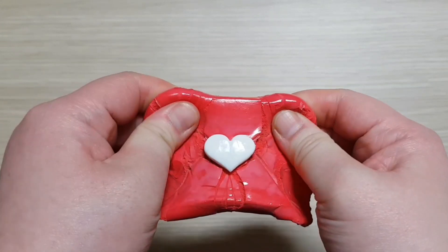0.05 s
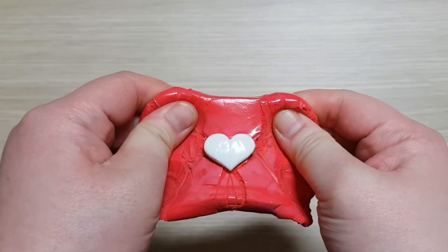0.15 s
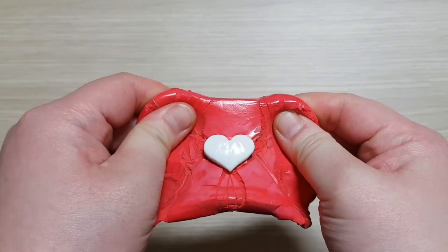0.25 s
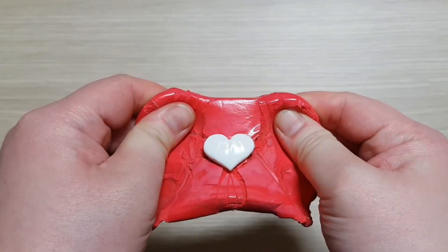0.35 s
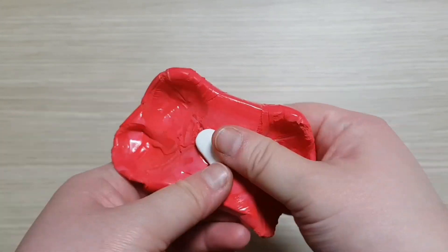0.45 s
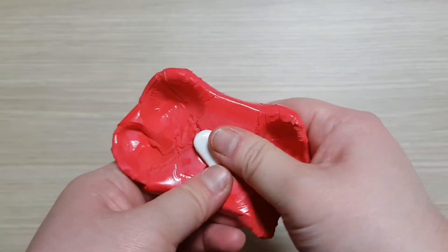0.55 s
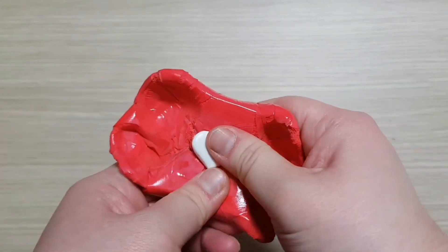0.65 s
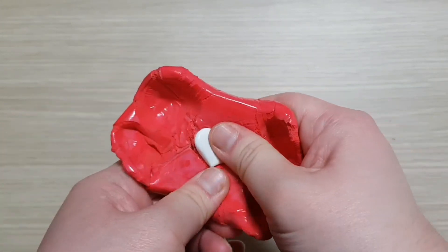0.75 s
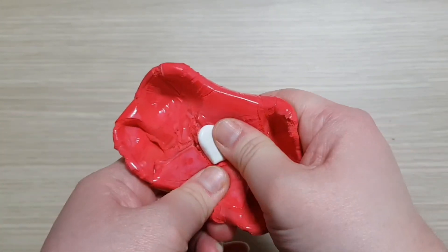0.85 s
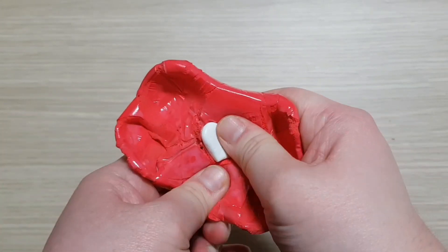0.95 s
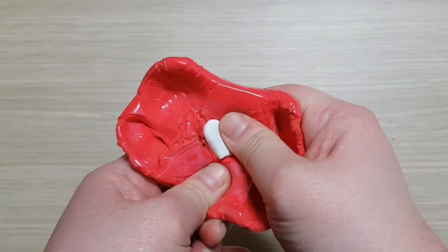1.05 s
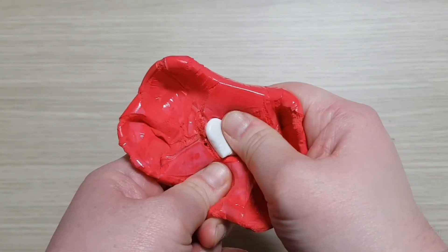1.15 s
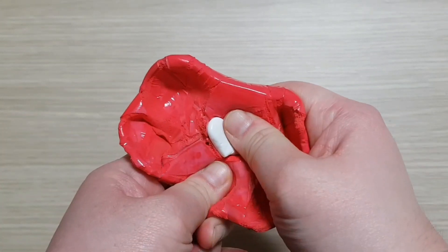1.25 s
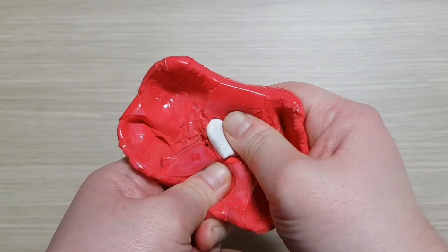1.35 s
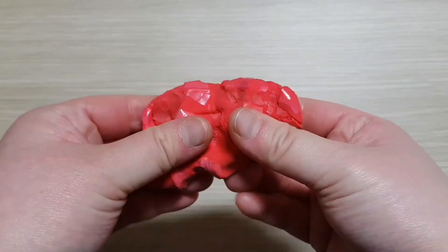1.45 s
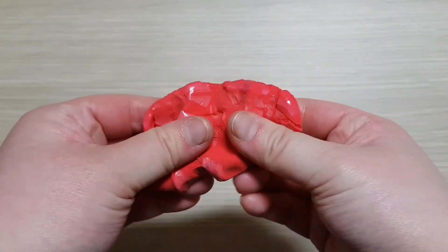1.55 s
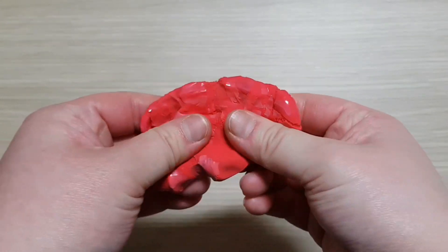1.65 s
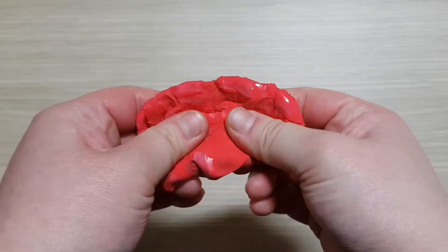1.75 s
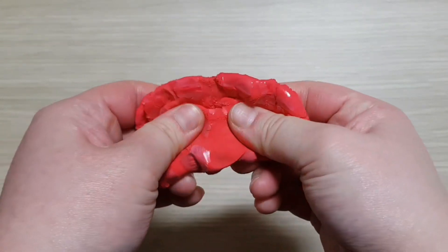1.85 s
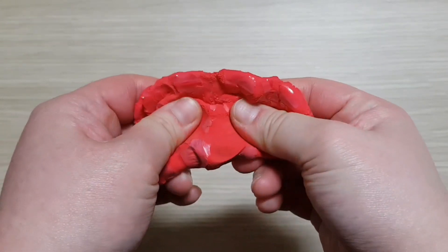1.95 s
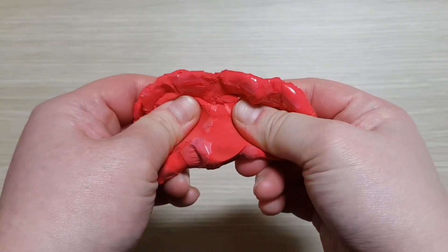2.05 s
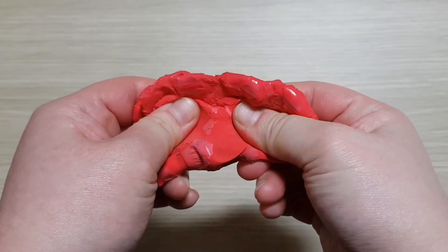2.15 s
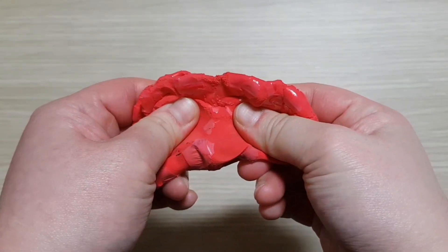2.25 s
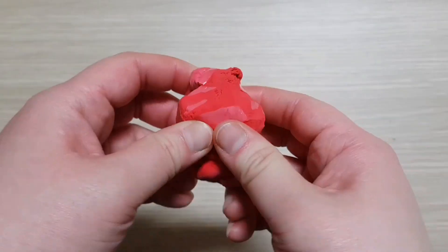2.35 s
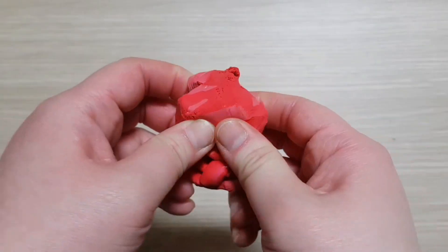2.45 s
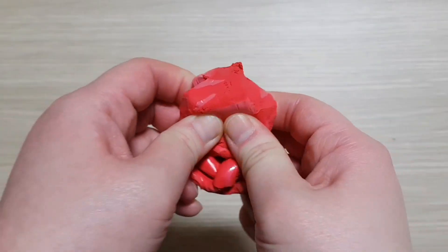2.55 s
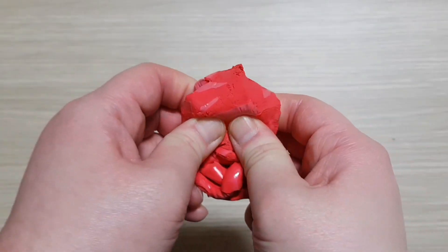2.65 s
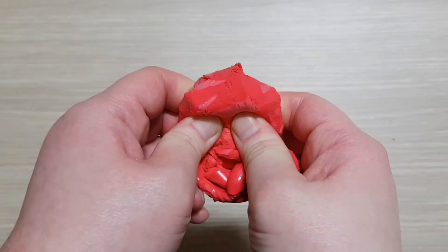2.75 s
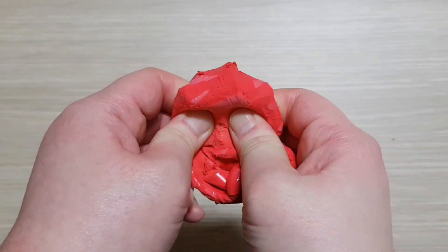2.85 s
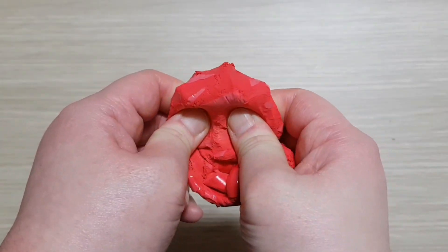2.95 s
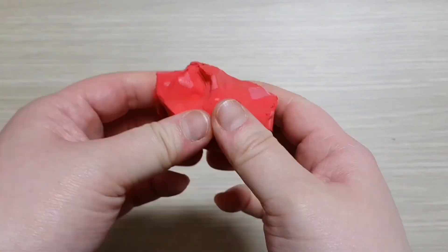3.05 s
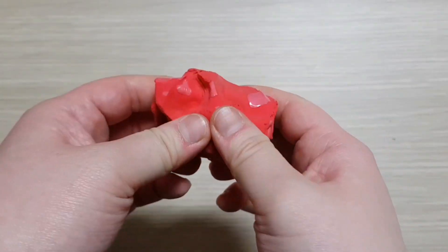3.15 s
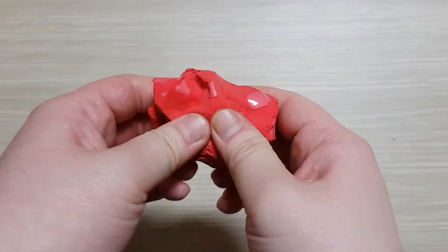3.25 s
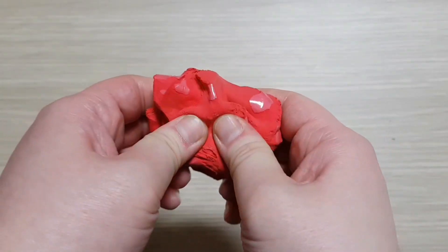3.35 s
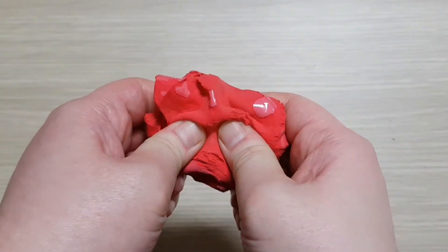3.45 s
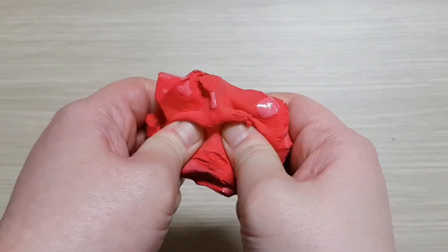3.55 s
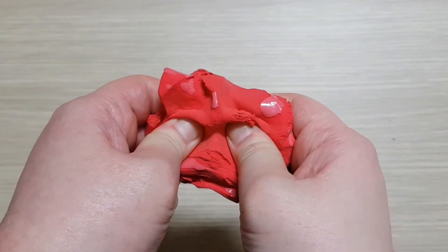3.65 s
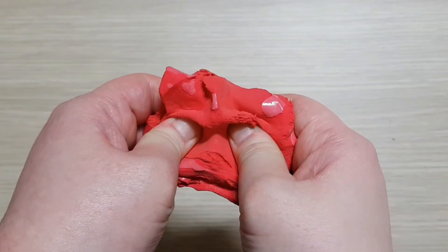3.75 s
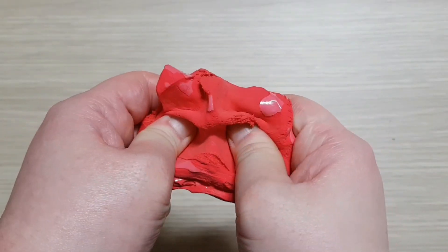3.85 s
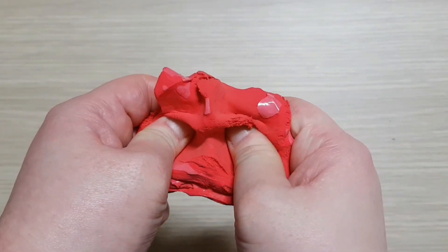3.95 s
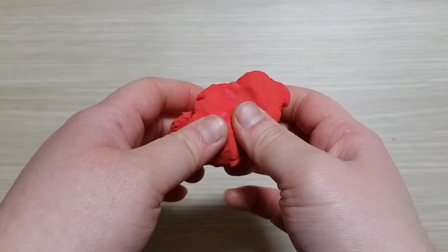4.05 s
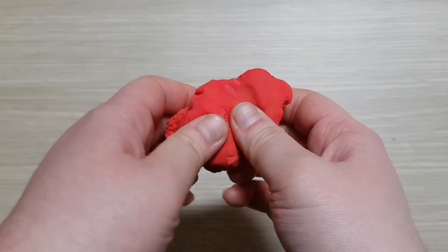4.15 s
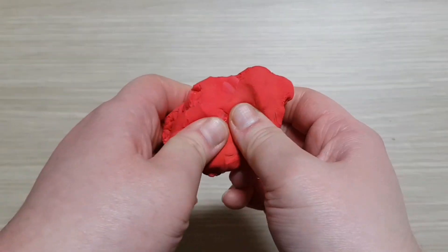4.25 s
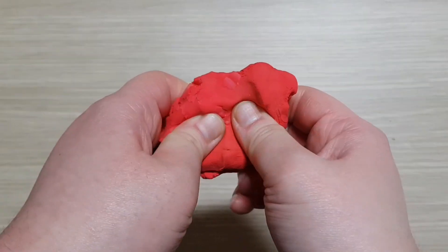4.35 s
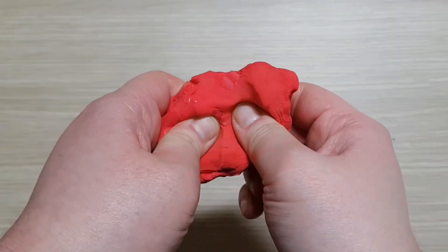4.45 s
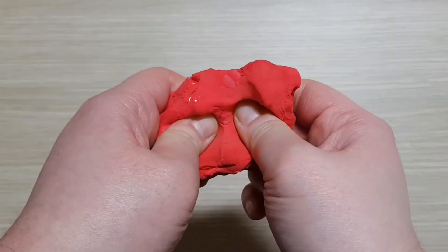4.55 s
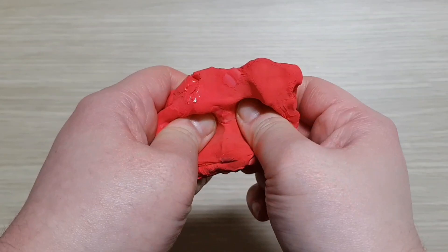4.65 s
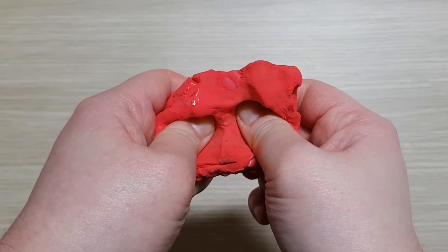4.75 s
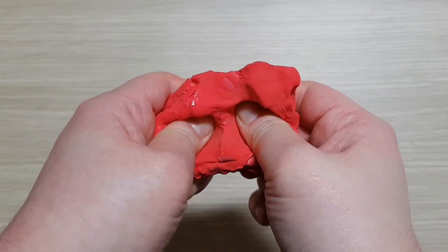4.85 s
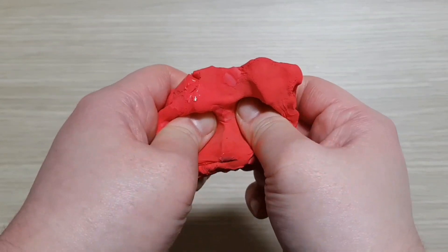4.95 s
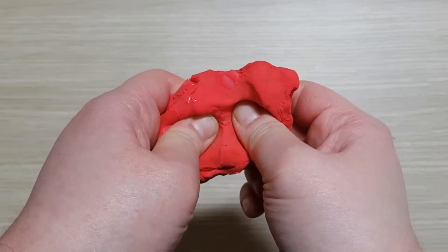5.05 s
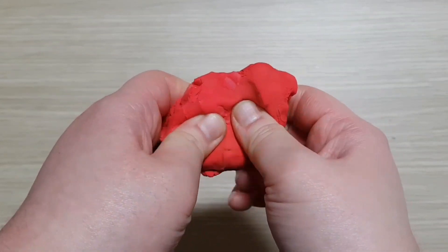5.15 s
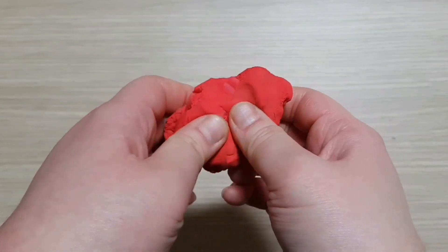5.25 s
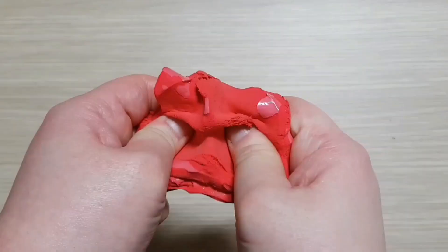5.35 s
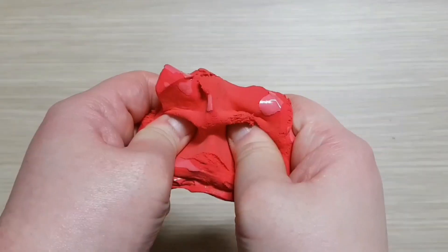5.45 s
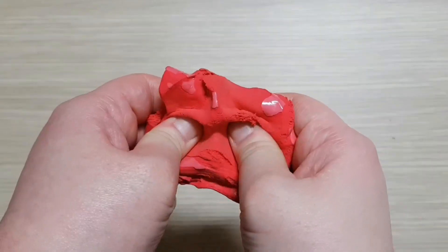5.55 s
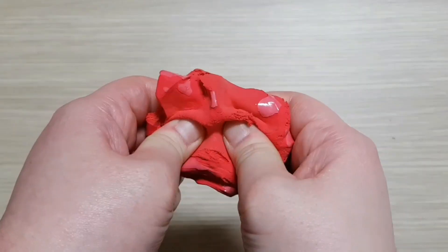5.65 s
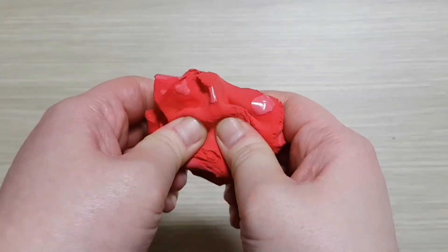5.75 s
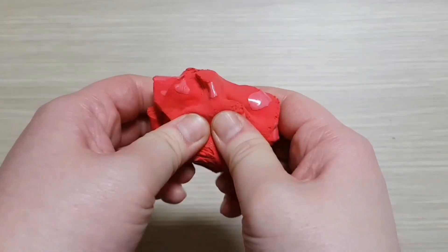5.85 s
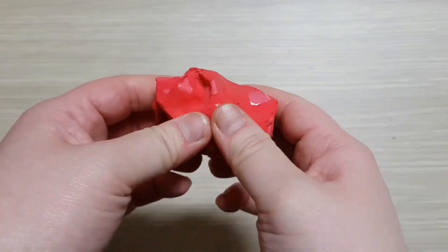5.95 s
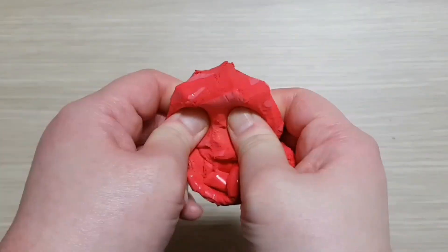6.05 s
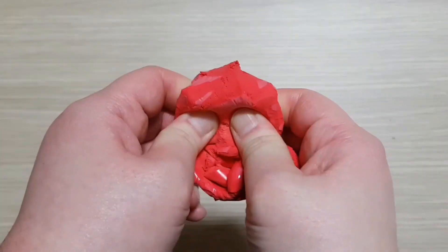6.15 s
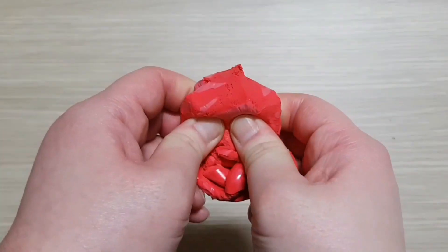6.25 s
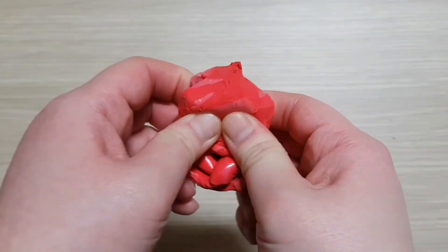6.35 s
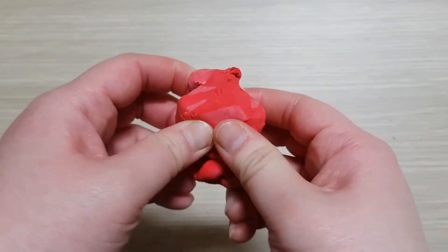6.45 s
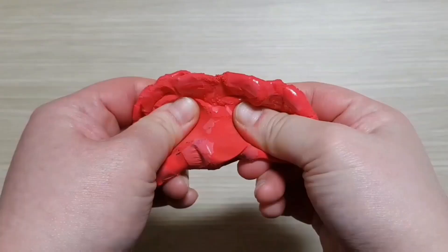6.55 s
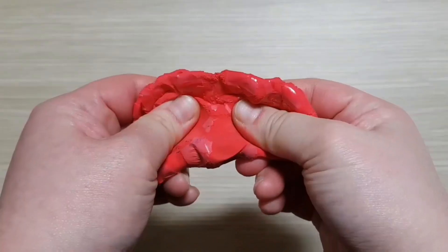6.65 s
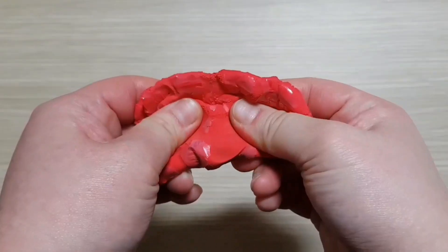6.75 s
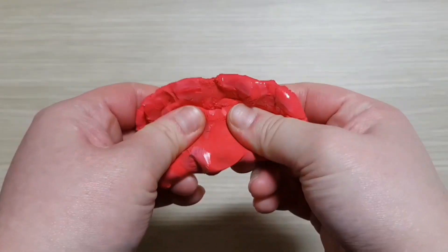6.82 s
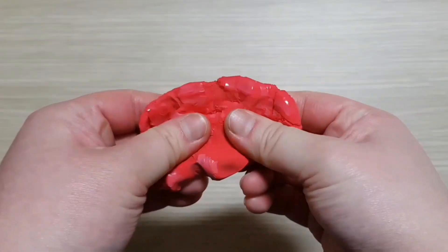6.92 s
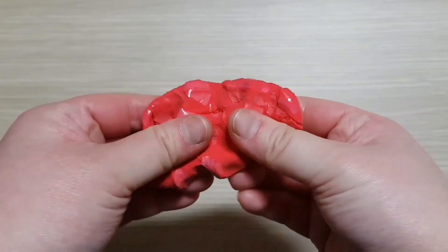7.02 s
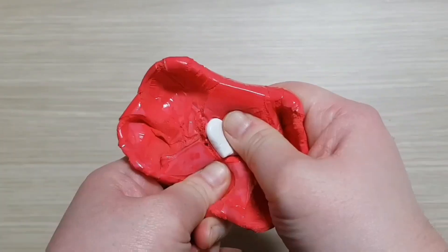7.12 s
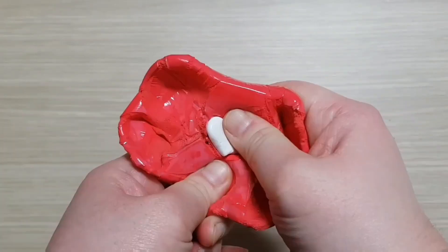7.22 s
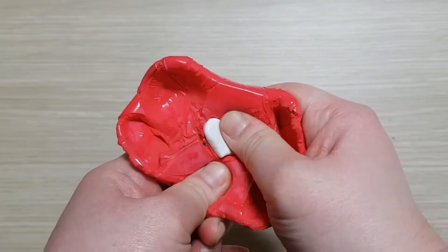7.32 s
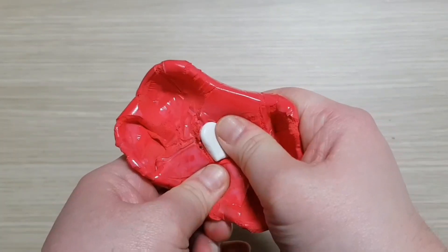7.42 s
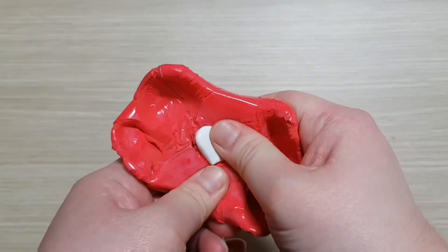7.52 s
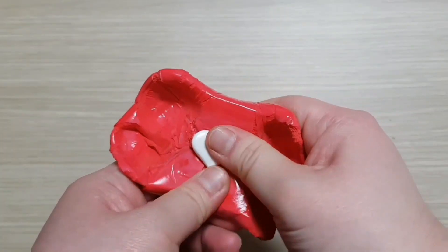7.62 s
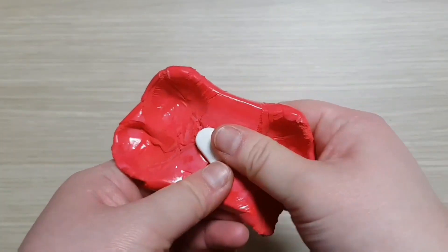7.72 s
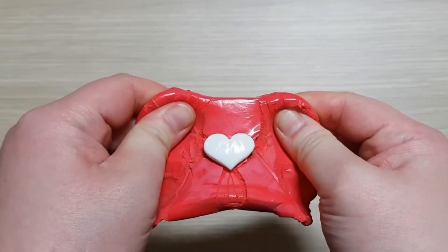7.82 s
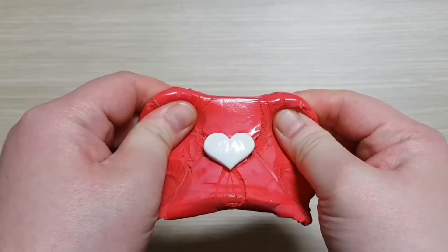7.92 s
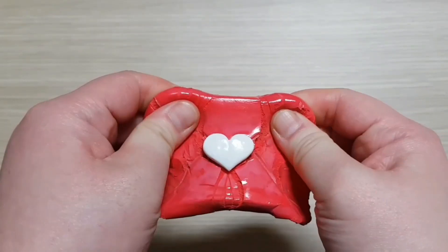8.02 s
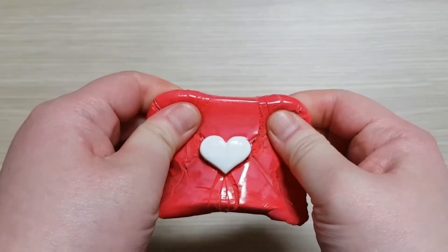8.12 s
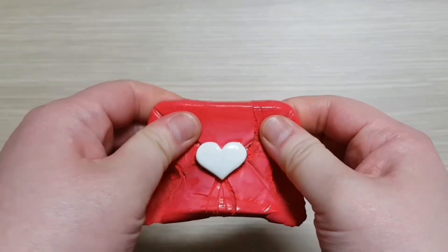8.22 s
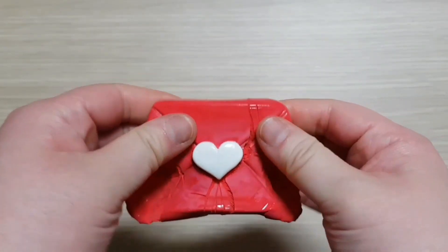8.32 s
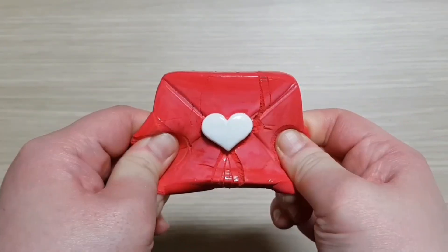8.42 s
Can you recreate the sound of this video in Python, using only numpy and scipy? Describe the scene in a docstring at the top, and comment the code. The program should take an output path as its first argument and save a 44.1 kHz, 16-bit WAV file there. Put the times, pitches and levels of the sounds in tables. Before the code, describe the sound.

Hands bend glazed clay in a quiet room, making sharp snaps and fine crackles that turn into faster, reversed crackling.

```python
"""Cracking glaze on soft clay

Hands bend a slab of soft clay in a small, quiet room. Its brittle glaze snaps in loud cracks and fine
crinkles, each a tiny burst of noise that makes slab and glaze ring. Six squeezes follow one another with
sudden cuts. Then they run backwards, one and a half times as fast at the same pitch, with left and
right swapped, and end on a few cracks that are heard only backwards."""
import sys
import numpy as np
from scipy import signal
from scipy.fft import rfft, irfft
from scipy.io import wavfile

SR = 44100
rng = np.random.default_rng(int(sys.argv[2]) if len(sys.argv) > 2 else 0)


def transcribe(signal):
    """Save signal, clipped to [-1, 1], as a 16-bit WAV file at the path in sys.argv[1]."""
    frames = np.atleast_2d(signal).T
    limited = np.clip(frames, -1, 1)
    pcm = np.round(limited * 32767).astype(np.int16)
    wavfile.write(sys.argv[1], SR, pcm)


N = 373968

# The loud cracks: time_s, mid_level_db, low_above_mid_db, top_above_mid_db
LOUD_CRACKS = [(0.023, -30.5, -4.5, -1.5), (0.035, -19.5, -13, -1), (0.055, -19, -7, 1.5),
               (0.0986, -20, -31, -22), (0.131, -11, -10, -6.5), (0.1395, -17, -11, 8.5),
               (.176, -20.5, -8, -1.5), (0.1817, -21.5, -24, 3.5), (0.248, -29.5, -14, 14.5),
               (0.2806, -21.5, -16, -7), (0.2993, -29.5, -26, 7.5), (.331, -23, -29, -4.5),
               (0.337, -35.5, -14.5, 9.5), (0.3978, -44, -41, 7.5), (0.474, -35.5, -37, 6),
               (0.7181, -44, -8.5, -3.5), (0.7842, -27, -14, 2.5), (0.822, -32, 2.5, 8.5),
               (0.8544, -23, 2.5, 7.5), (0.86, -20, -6.5, 5.5), (0.8667, -14, -10.5, 1.5),
               (0.9251, -22, -7.5, 3), (0.9439, -24.5, -1.5, 1.5), (0.9768, -24.5, -5.5, -3),
               (1.024, -19.5, -4.5, 3.5), (1.0624, -20, 1, 3), (1.1193, -29.5, -16, 5.5),
               (1.196, -28, -40, -2.5), (1.2255, -22.5, -18.5, 3), (1.241, -11, -25, -5.5),
               (1.394, -40, -25, -9), (1.4102, -37.5, -10, -2), (1.4314, -15, -28.5, -20.5),
               (1.4686, -29.5, -39, -19), (1.67, -40.5, 1.5, 0.5), (1.75, -36.5, -5.5, -7),
               (1.7734, -35, -1.5, 6.5), (1.7935, -28, -24.5, -2), (1.8015, -32, -6.5, 3.5),
               (1.8153, -31.5, 3.5, -6.5), (1.852, -36, -8.5, -4), (1.8604, -25.5, -18.5, -7),
               (1.9035, -48.5, 0.5, 7), (1.974, -10, -7, -4), (2.0335, -22.5, -16, -6),
               (2.084, -24, -35, -1), (2.1104, -20, -7.5, 1.5), (2.122, -21, -2, 0),
               (2.1421, -24, -9.5, -4.5), (2.225, -32, -32, -12), (2.254, -23.5, -9, -2.5),
               (2.582, -35.5, -21.5, 10.5), (2.716, -31, -24, 1), (2.747, -15.5, -10, 0),
               (2.781, -28, -4.5, 0), (2.801, -41, -6, 15.5), (2.8153, -32, 3, -10), (2.8355, -30, -19, 7),
               (2.8451, -22, -6, 4.5), (2.865, -29.5, 0, 4), (2.925, -33, -16.5, 0),
               (2.9299, -26.5, -10, 4), (2.9893, -29.5, -21, 6), (3.047, -38.5, -25, 11.5),
               (3.0821, -27.5, -43, -1.5), (3.1321, -40, -37, 6.5), (3.249, -40, -19.5, -7.5),
               (3.317, -54, -14, -5), (3.371, -57.5, 13, -11.5), (3.4, -35, -10, -4.5),
               (3.4482, -33, -67, 2.5), (3.4843, -23, -2.5, -1), (3.517, -22.5, 4, 5),
               (3.5423, -32, 1.5, 2.5), (3.5778, -19.5, 1.5, 1.5), (3.59, -32, -4.5, 5.5),
               (3.6259, -24.5, -5.5, 6), (3.6517, -31.5, -5, -5), (3.6755, -21.5, -18, -0.5),
               (3.7508, -25.5, -42, -7), (3.7792, -26, -5.5, 3), (3.8228, -25, -11.5, 3),
               (3.8686, -16.5, -12, -1), (3.9033, -21.5, -14, -8), (3.928, -28, -16.5, 3),
               (3.999, -28.5, -29, 7.5), (4.045, -11.5, -10.5, -4), (4.058, -25.5, -18, 7.5),
               (4.2791, -47, -5, -1), (4.3715, -41, 1, 14), (4.5063, -31.5, -8, 9.5),
               (4.5742, -37.5, -7, 6), (4.612, -30.5, -13, 4), (4.6619, -17, -14, -2),
               (4.706, -28, -10, -1.5), (4.777, -28.5, -21.5, -5), (4.85, -34, -34, -3),
               (4.8754, -34.5, -23, -3), (8.244, -21.5, -7, 9), (8.2628, -10.5, -13, -3.5),
               (8.2736, -26, -12, 4), (8.2857, -21, -21, 8), (8.2954, -29, -5, -12),
               (8.311, -21.5, -14, -3)]
# The notes at which the glaze rings: pitch_hz, width_hz, level_db
GLAZE_RINGS = [(1000, 1180, -21.5), (2400, 690, 10), (4650, 2480, 0.5), (6544, 1610, 2.5),
               (11180, 5450, -1.5), (13950, 8600, -8)]
# The low, mid and top band that those notes are sorted into: from_hz, to_hz
BANDS_HZ = [(500, 2800), (2800, 8500), (8500, 17000)]
# Each squeeze bends the slab another way: crinkle_start_s, hollow_pitch_hz, hollow_ring_db,
# upper_ring_db, left_above_right_db, hardest_crinkle_low_above_mid_db
SQUEEZES = [(8.318, 1540, 1, -5.5, -0.5, -1.5), (.78, 1685, 6.5, 1, 1.5, 0),
            (1.745, 1620, -6, -3.5, 1.5, 4.5), (2.55, 1446, -4, -7.5, 2.5, -2.5),
            (3.37, 1534, 1, 4.5, 2, -4), (4.275, 1610, 5.5, -2, 0.5, -1)]
# The cut that ends each squeeze: time_s
CUTS_S = [.513, 1.552, 2.412, 3.178, 4.177, 4.98]
# Thumb pushes that set off crinkles: peak_time_s, level_db, rise_db_per_s, fall_db_per_s
THUMB_PUSHES = [(8.299, -22.5, 900, 54), (0.021, -29.5, 101, 63), (.83, -24.5, 610, 119),
                (1.281, -35, 26, 337), (1.469, -40.5, 200, 330), (1.77, -48, 301, 17),
                (2.05, -34.5, 21, 69), (2.741, -28, 91, 64), (3.571, -28, 81, 71.5), (3.8, -35.5, 24, 63),
                (4.522, -42, 44, 27)]
# Cracks that come back extra faint when running backwards: time_s
FAINT_RETURNS_S = [.14, .249, .398, .474, .824, .868, .977, 1.026, 1.242, 2.084, 2.255, 3.518, 4.373, 4.851]
# Low thumps as the loudest cracks overload the microphone: time_s, peak_db
OVERLOAD_THUMPS = [(.1405, -37.5), (1.0635, -52.5), (1.9758, -40.5), (2.7484, -26.5), (4.0472, -22.5)]
# How long the room takes to fade by 60 dB at speed 1: low_s, mid_s, top_s
ROOM_DECAY_S = [0.23, 0.24, 0.21]
# The tone of the background hiss: pitch_hz, relative_level_db
HISS_SHAPE = [(20, -14), (70, 0), (500, -10), (1100, -15), (3500, -18.5), (8300, -25), (15500, -13)]
# A low, wavering hum: time_s, pitch_hz, level_db
HUM_PATH = [(1.52, 47, -72), (1.73, 55, -63), (2.09, 55, -63), (2.19, 50, -65), (2.36, 53, -61),
            (2.42, 53, -80)]

TURN_S, BACKWARD_SPEED = 4.988, 1.5  # when the sound turns round, and how fast it then runs
MIRROR_S = 8.2203  # when the backward run passes the very first moment again
SNAP_RISE_S = 0.0007  # half the length of the brief swell leading into each snap
LET_GO_S = .08  # the crinkles stop this long before each cut


def glaze_snaps(hollow_hz, hollow_db, upper_db, size=512):
    """Each break is a noise burst that rings slab and glaze. Axes: band, crack, side, sample."""
    count = len(hollow_hz)
    t = np.arange(size) / SR - 2 * SNAP_RISE_S
    rise = from_db(-4.5 + 11991 * t)
    snap = from_db(-60 * t / 0.002)
    crumbling = from_db(-7 - 60 * t / 0.011)
    envelope = np.where(t < 0, rise, snap + crumbling)
    noise = rng.standard_normal((count, 3, size)) * envelope  # shared, left, right
    noise[:, :, np.argmax(envelope)] = from_db(7.5) * np.sign(noise[:, :1, 0])  # a tick as it breaks
    shared, right_lag_samples = 0.25, 5.48
    sides = np.sqrt(shared) * noise[:, :1] + np.sqrt(1 - shared) * noise[:, 1:]
    sides[:, 1] = filtered(sides[:, 1], lambda hz: np.exp(-2j * np.pi * hz * right_lag_samples / SR))
    # every flake has its own size and shape, so its rings differ in pitch and strength
    chance = rng.standard_normal((count, 1 + len(GLAZE_RINGS)))
    detune, flake_db = np.exp(0.05 * chance[:, :1, None]), 6 * chance[:, 1:]
    bands = np.array([filtered(sides, lambda hz: glaze_tone(hz * detune, low, high, flake_db))
                      for low, high in BANDS_HZ])
    hollow_ring = lambda hz: ring(hz * detune, hollow_hz[:, None, None], 600, hollow_db[:, None, None])
    upper_ring = lambda hz: ring(hz * detune, 3114, 380, upper_db[:, None, None])
    bands[0] -= filtered(sides, hollow_ring)
    bands[1] -= filtered(sides, upper_ring)
    power = np.mean(bands ** 2, axis=(2, 3), keepdims=True) * size / (.003 * SR)  # as if 3 ms long
    return bands / np.sqrt(power)


def glaze_tone(hz, low_hz, high_hz, flake_db):
    """The glaze's rings within one band, each as strong as this flake makes it."""
    return sum((-1) ** k * ring(hz, pitch, width, db + flake_db[:, k, None, None])
               for k, (pitch, width, db) in enumerate(GLAZE_RINGS) if low_hz <= pitch < high_hz)


def ring(hz, pitch_hz, width_hz, db):
    """A ringing object passes sound near its own pitch and little else."""
    return from_db(db) / (1 + 1j * (hz / pitch_hz - pitch_hz / hz) * pitch_hz / width_hz) ** 2


def cracks_and_crinkles(starts, cuts, crinkle_low_db, count=420):
    """List the loud cracks and the tiny random ones, in the columns of LOUD_CRACKS and in clay time."""
    loud = np.array(LOUD_CRACKS, float)
    loud[:, 0] = clay_time(loud[:, 0])
    chance = rng.random((count, 2))
    earliest = clay_time(N / SR)
    at = earliest + (cuts[-1] - earliest) * chance[:, 0]
    squeeze = np.searchsorted(cuts[:-1], at)
    push_db = thumb_pressure(at)
    scatter_db = 9.5 * np.tanh(0.5 * np.log(1 - chance[:, 1]) / 9.5)  # each a little fainter, by chance
    low_db = crinkle_low_db[squeeze] + 0.37 * (push_db - push_db.max())  # gentler pushes sound thinner
    top_db = np.full(count, 2.5)
    crinkles = np.column_stack([at, push_db + scatter_db, low_db, top_db])
    resting = (push_db < -62) | (at < starts[squeeze]) | (cuts[squeeze] - at < LET_GO_S)
    crinkles[resting, 1] = -np.inf
    return np.vstack([loud, crinkles])


def thumb_pressure(at):
    """The strongest push at each moment sets the crinkle level, in dB."""
    peak_s, db, rise, fall = np.transpose(THUMB_PUSHES)
    since = at[:, None] - clay_time(peak_s)
    return np.max(db + np.where(since < 0, since * rise, -since * fall), axis=1)


def cracks_in_room(snaps, at, mid_db, low_db, top_db, pan_db, speed):
    """Place each snap in time and add the room's echo, which a higher speed shortens."""
    heard = (at > 0) & (at < N / SR - .02)
    index = ((at[heard] - SNAP_RISE_S) * SR).astype(int).clip(0)[:, None] + np.arange(snaps.shape[-1])
    t = np.arange(SR // 2) / SR
    echo_gap_s, echo_db = .005, -10.5
    sound = np.zeros((2, N))
    for band, db, decay_s in zip(snaps, (mid_db + low_db, mid_db, mid_db + top_db), ROOM_DECAY_S):
        direct = np.zeros((2, N))
        for side, lean in enumerate((.5, -.5)):
            scaled = band[heard, side] * from_db(db + lean * pan_db)[heard, None]
            direct[side] = np.bincount(index.ravel(), scaled.ravel(), N)
        # the walls send the sound of each side back to both sides
        echo = rng.standard_normal((2, 2, len(t))) * from_db(-60 * t * speed / decay_s) * (t > echo_gap_s)
        echo *= from_db(echo_db) / np.sqrt(speed * np.sum(echo ** 2) / 2)
        sound += direct + signal.oaconvolve(direct[None], echo, axes=2).sum(axis=1)[:, :N]
    return sound


def glaze_fizz(time, starts, cuts, step=64):
    """Flakes too fine to hear one by one make a grainy fizz that follows the thumbs."""
    at = time[::step]
    squeeze = np.searchsorted(cuts[:-1], at)
    grain_db = 4 * rng.standard_normal(len(at))
    pressing = (at > starts[squeeze]) & (cuts[squeeze] - at > LET_GO_S / 2)
    level = from_db(thumb_pressure(at) - 12 + grain_db) * pressing
    tone = lambda hz: np.abs(glaze_tone(hz, BANDS_HZ[1][0], SR, np.zeros((1, len(GLAZE_RINGS))))[0])
    return unit_level(filtered(rng.standard_normal((2, N)), tone)) * np.repeat(level, step)[:N]


def overload_thumps(time, width_s=0.00012):
    """One-way pulses of an overloaded microphone: leaning left, then softer and right going back."""
    speed = np.abs(np.gradient(time)) * SR
    pulses = sum(from_db(db) * np.exp(-((time - at) / speed / width_s) ** 2 / 2)
                 for at, db in OVERLOAD_THUMPS)
    side_db = np.array([[2.5], [-2.5]])
    return pulses * from_db(np.where(np.arange(N) > TURN_S * SR, -4 - side_db, side_db))


def room_hiss(level_db=-63.5):
    """The quiet room and the microphone hiss; left and right share only the bass."""
    pitch_hz, db = np.transpose(HISS_SHAPE)
    common, own = rng.standard_normal(N), rng.standard_normal((2, N))
    share = lambda hz: .5 / (1 + (hz / 550) ** 4)
    noise = filtered(common, lambda hz: np.sqrt(share(hz)))
    noise = noise + filtered(own, lambda hz: np.sqrt(1 - share(hz)))
    tone = lambda hz: from_db(np.interp(np.log(hz), np.log(pitch_hz), db))
    return from_db(level_db) * unit_level(filtered(noise, tone))


def rumble_and_hum(time, pitch_hz=62, width_hz=79, rumble_db=-70.5):
    """A steady low rumble and a brief hum; going backwards, the hum becomes a swell in the rumble."""
    common, own = rng.standard_normal(N), rng.standard_normal((2, N))
    rumble = filtered(common + .5 * own, lambda hz: 1 / (1 + (2 * (hz - pitch_hz) / width_hz) ** 2))
    hum_s, hum_hz, hum_db = np.transpose(HUM_PATH)
    hum_level = from_db(np.interp(time, hum_s, hum_db, -np.inf, -np.inf))
    hum = np.sqrt(2) * np.sin(2 * np.pi * np.cumsum(np.interp(time, hum_s, hum_hz)) / SR)
    turned = np.arange(N) > TURN_S * SR
    rumble_level = np.hypot(from_db(rumble_db), hum_level * turned)
    return unit_level(rumble) * rumble_level + hum * hum_level * ~turned


def clay_time(heard_s):
    """Which moment of the squeezing is heard; after MIRROR_S it is a moment before zero."""
    return np.where(heard_s > TURN_S, (MIRROR_S - heard_s) * BACKWARD_SPEED, heard_s)


def from_db(db):
    """Turn decibels into a factor to multiply by."""
    return 10 ** (np.asarray(db) / 20)


def filtered(x, gain):
    """Multiply each frequency in x by gain(hz)."""
    size = x.shape[-1]
    return irfft(rfft(x) * gain(np.arange(size // 2 + 1) * SR / size + 1e-9), size)


def unit_level(x):
    """Scale each side to an average power of 1."""
    return x / np.sqrt(np.mean(x ** 2, axis=-1, keepdims=True))


def scene():
    """The squeezes run forwards, fade briefly, then run quickly backwards."""
    cuts = np.array(CUTS_S)
    starts, hollow_hz, hollow_db, upper_db, pan_db, crinkle_low_db = np.transpose(SQUEEZES)
    starts = clay_time(starts)
    at, mid_db, low_db, top_db = cracks_and_crinkles(starts, cuts, crinkle_low_db).T
    squeeze = np.searchsorted(cuts[:-1], at)
    snaps = glaze_snaps(hollow_hz[squeeze], hollow_db[squeeze], upper_db[squeeze])
    pan_db = pan_db[squeeze] + 2 * rng.standard_normal(len(at))
    forward = cracks_in_room(snaps, at, mid_db, low_db, top_db, pan_db, speed=0.84)
    faint = np.abs(at[:, None] - FAINT_RETURNS_S).min(axis=1) < .003
    fast_db = mid_db + np.where(faint, -5.5, -2)
    fast_at = N / SR - MIRROR_S + at / BACKWARD_SPEED
    fast = cracks_in_room(snaps, fast_at, fast_db, low_db, top_db, pan_db, speed=BACKWARD_SPEED)
    t = np.arange(N) / SR
    time = clay_time(t)
    cracks = np.where(t > TURN_S, fast[::-1, ::-1], forward)  # flip both the sides and the time
    # each cut between squeezes chops off the echo
    chopped = sum((time > cut) & (time < cut + .06) for cut in cuts[:-1])
    clay = cracks * (1 - chopped) + glaze_fizz(time, starts, cuts)
    fade = np.where(t > TURN_S, 1, from_db(np.interp(t, (4.966, 4.98), (0, -26))))
    return (clay + overload_thumps(time) + room_hiss() + rumble_and_hum(time)) * fade


def record(dry):
    """A lopsided microphone gives loud cracks a low knock; peaks and the highest treble are cut off."""
    clipped = np.clip(dry + 0.028 * dry ** 2, -.95, .95)
    return signal.sosfilt(signal.ellip(10, .2, 70, 15900, fs=SR, output="sos"), clipped)


dry = scene()
out = record(dry)
transcribe(out)
```